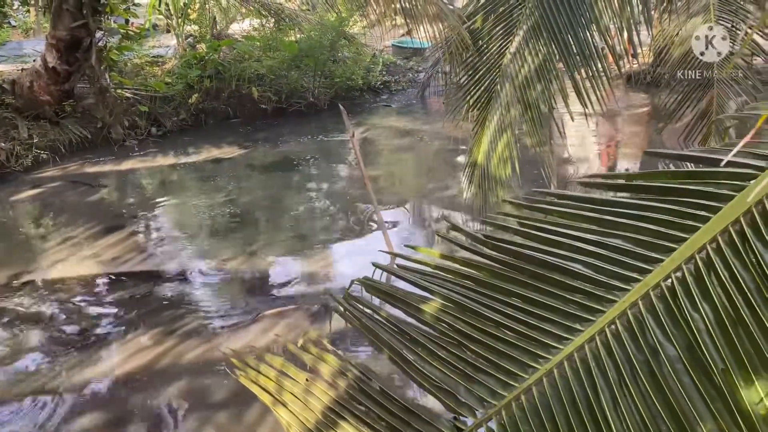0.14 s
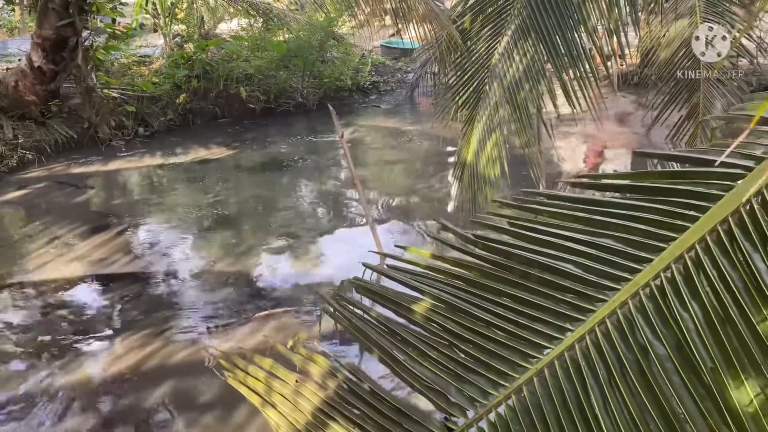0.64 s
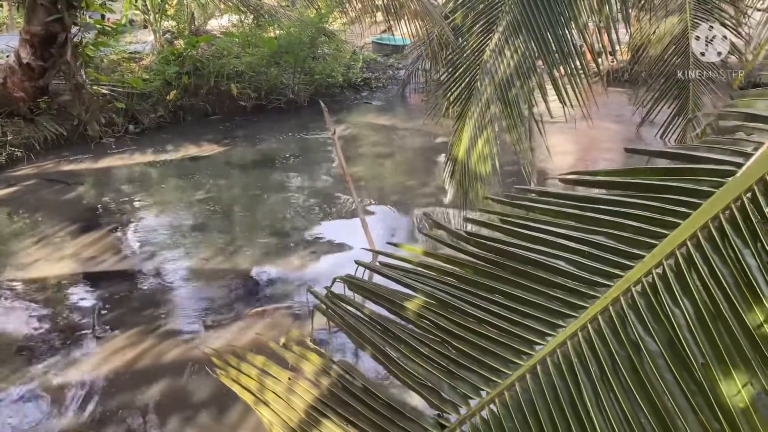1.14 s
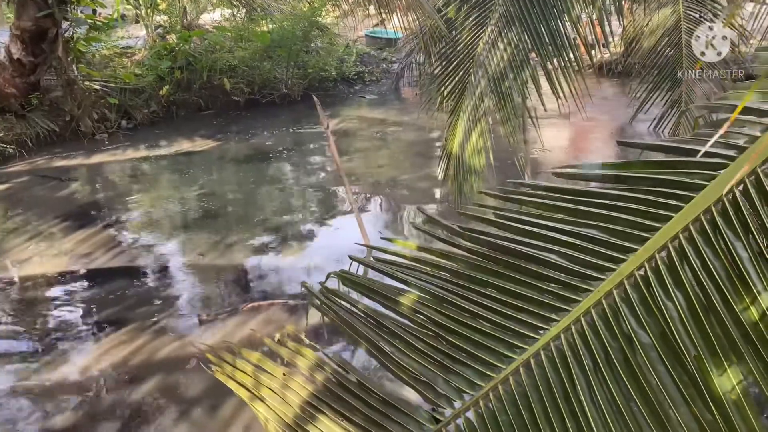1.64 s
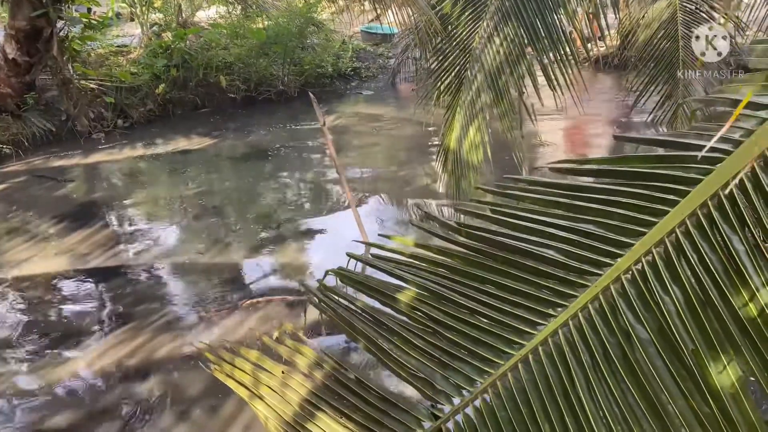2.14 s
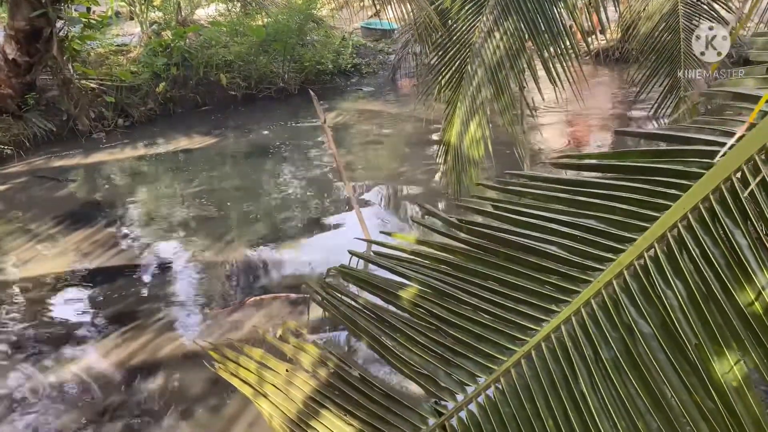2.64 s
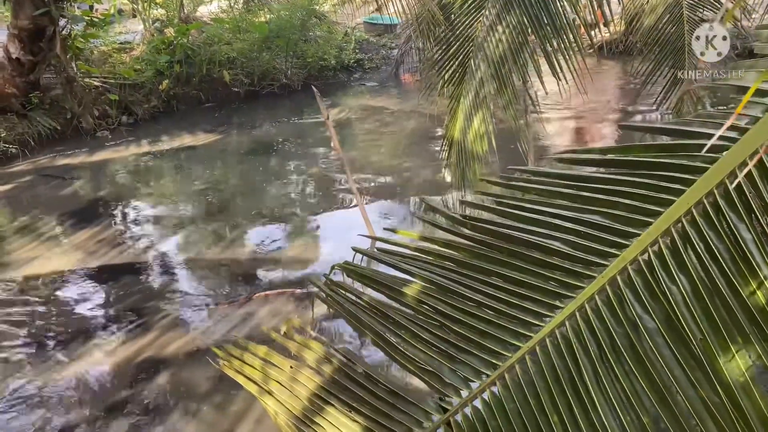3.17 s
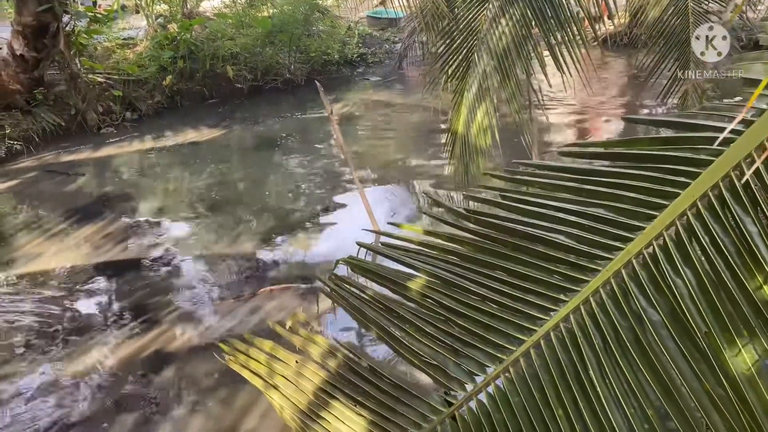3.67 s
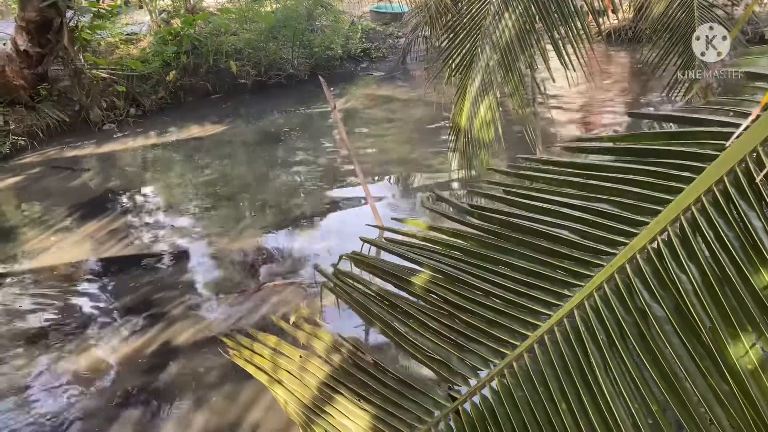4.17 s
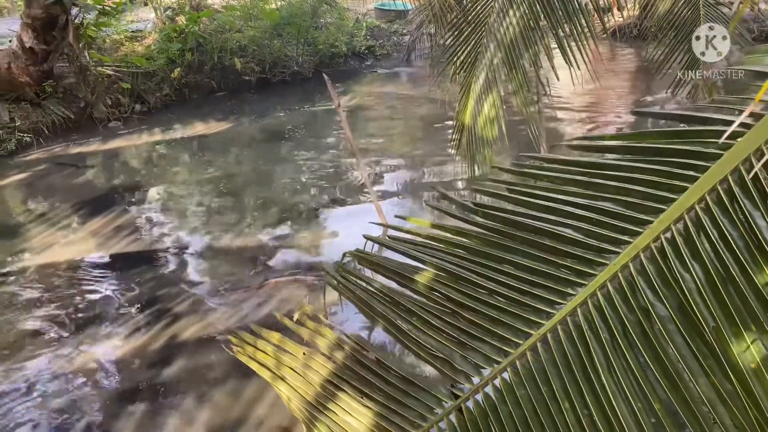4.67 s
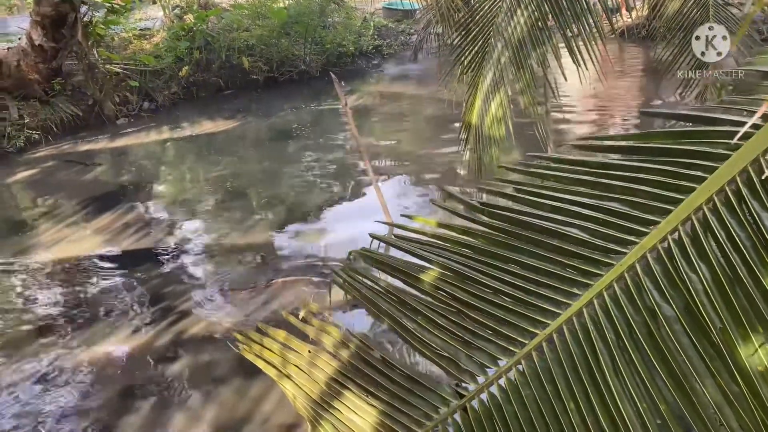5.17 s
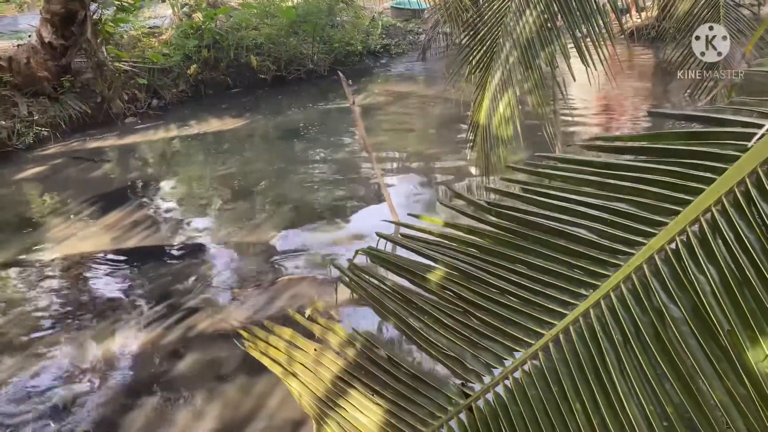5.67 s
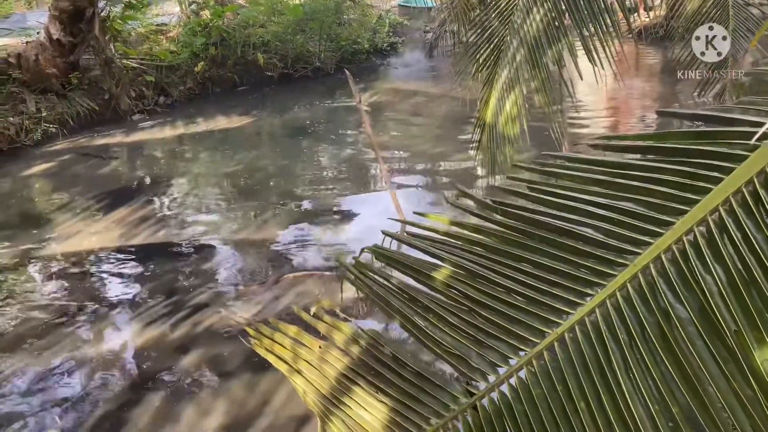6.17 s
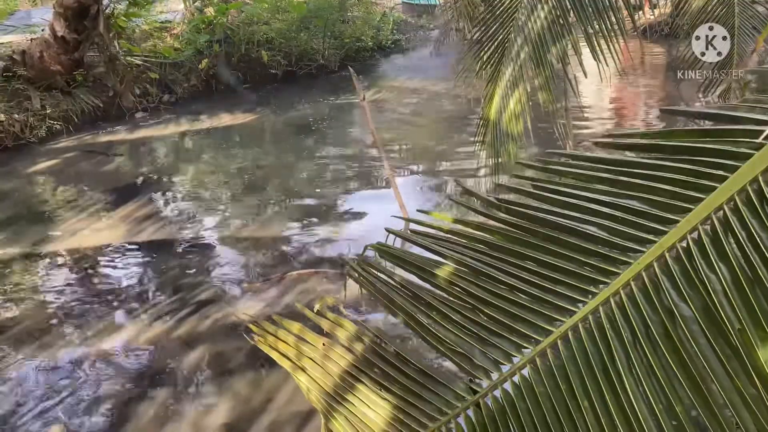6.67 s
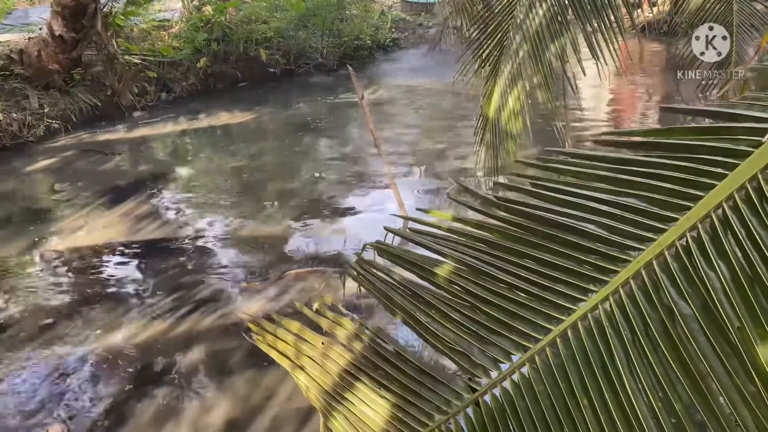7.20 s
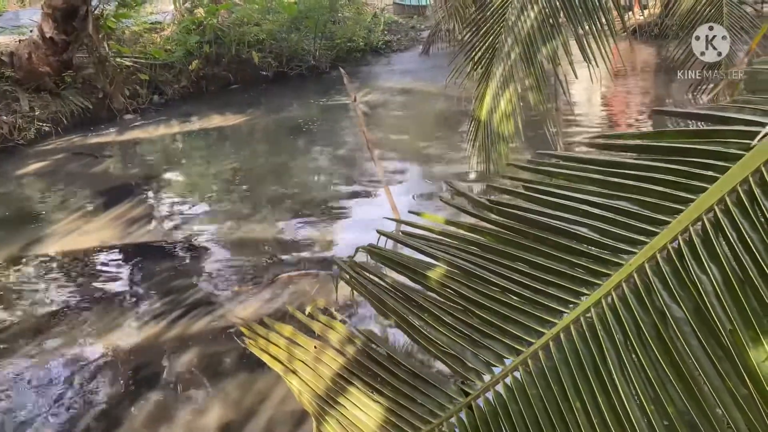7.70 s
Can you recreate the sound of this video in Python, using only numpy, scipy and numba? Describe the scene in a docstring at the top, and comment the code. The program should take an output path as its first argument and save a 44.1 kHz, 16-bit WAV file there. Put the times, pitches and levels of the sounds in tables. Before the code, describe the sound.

A phone a few metres from the water picks up crisp splashes and hollow bubbling plops, mixed with short, throbbing, upward bird whistles. From two to nearly five seconds it is mostly quiet, with tiny drips over faint open air. After a small splash comes a loud bright slap, then dense churning, spray and deep gurgles, thinning to plops at the end. Banks and leaves add only a short blur.

```python
"""A shallow canal, a few metres from a phone: fish thrash at the surface in bursts with calm between.
Tails slap the water (noise cracks with spray); trapped air plops and gurgles (decaying resonances).
A bird whistles upward in the palms and a second one buzzes (frequency-swept sines); a faint coo is far off.
Banks and leaves return a short blur (noise response) over a distant low rumble (shaped noise)."""
import sys
import numpy as np
from scipy import signal
from scipy.fft import rfft, irfft
from scipy.io import wavfile
from scipy.ndimage import uniform_filter1d
from numba import njit

SR = 44100
rng = np.random.default_rng(int(sys.argv[2]) if len(sys.argv) > 2 else 0)


def linear_from_db(decibels):
    """Turn decibels (scalar or array-like) into linear amplitude factors; 0 gives 1."""
    return 10 ** (np.asarray(decibels, float) / 20)


def store_wav(level_fs):
    """Save 16-bit WAV to argv[1]."""
    pcm = np.round(np.clip(np.atleast_2d(level_fs), -1, 1) * 32767)
    wavfile.write(sys.argv[1], SR, pcm.T.astype(np.int16))


N = 344862
TIME = np.arange(N) / SR


def level(x, db):
    """Root-mean-square normalisation: scale the signal to an rms level in dB."""
    return x * linear_from_db(db) / np.sqrt(np.mean(x ** 2))


def band(x, lo_hz, hi_hz, order=2):
    """Band-pass filtering with a maximally flat passband."""
    sos = signal.butter(order, [lo_hz, min(hi_hz, .45 * SR)], "band", fs=SR, output="sos")
    return signal.sosfilt(sos, x)


def walk(rate):
    """Slow random modulation: normal values held for 1 / rate s, then slewed twice; spread near 1."""
    hold = int(SR / rate)
    held = np.repeat(rng.standard_normal(N // hold + 1), hold)
    return 1.3 * uniform_filter1d(uniform_filter1d(held, hold), hold)[:N]


def air():
    """Ambient noise: spectrally shaped rumble and leaf hiss; octaves swell together and flicker alone."""
    # noise spectrum: (frequency [Hz], relative density [dB per Hz])
    spectrum = [(18, -51.5), (30, -23), (42, -14), (62, 0.5), (125, -4), (170, -10), (280, -7.5),
                (340, -12), (500, -13), (850, -16.5), (2750, -32), (6000, -32.5), (11400, -34),
                (16000, -40)]
    hz, db = np.transpose(spectrum)
    f = np.arange(N // 2 + 1) * SR / N + 1e-3
    colour = rfft(rng.standard_normal(N)) * linear_from_db(np.interp(np.log(f), np.log(hz), db))
    out, swell = 0, walk(0.73)
    for centre in 22 * 2. ** np.arange(10):
        # neighbouring octaves crossfade and add up to one
        share = np.cos(np.pi / 2 * np.clip(np.log2(f / centre), -1, 1)) ** 2
        out = out + irfft(colour * share, N) * linear_from_db(0.5 * swell + 1.1 * walk(8))
    return level(out, -59.5)


def blur(x, t60_s, wet_db, low_hz=503.0, top_hz=7000., gap_s=0.0053, lump_db=5.):
    """Diffuse scattering from banks and leaves: convolution with exponentially decaying noise."""
    t = TIME[:SR // 2]
    lumps = linear_from_db(lump_db * walk(251)[:len(t)])  # trunks and banks stand out as separate returns
    tail = band(rng.standard_normal(len(t)) * lumps, low_hz, top_hz, order=1)
    # the returns build up over gap_s and fall 60 dB in t60_s
    tail = tail * 1000 ** (-t / t60_s) * np.clip(t / gap_s, 0, 1) ** 2
    tail = linear_from_db(wet_db) * tail / np.sqrt(np.sum(tail ** 2))
    return x + signal.fftconvolve(x, tail)[:N]


def whistles():
    """Frequency and amplitude modulation: a sine climbs in pitch while its level throbs."""
    # contour of one whistle: (time from start [s], frequency [Hz], relative level [dB])
    contour = [(0, 3700, -12), (.012, 3740, 1), (.025, 3800, -5), (.035, 4000, -2.5), (.08, 4490, 0),
               (.12, 5050, -1.5), (.145, 5650, -7), (.17, 6350, -10), (.185, 6500, -25)]
    # the whistles: (start [s], level before flutter and blur [dB], time stretch [ratio])
    calls = [(.035, -50.5, 1.15), (.41, -63, 1.1), (.76, -52.5, 1.05), (1.15, -52.5, 1),
             (1.553, -53.5, 1.08), (1.96, -51, 1.01)]
    out, (at, hz, db) = np.zeros(N), np.transpose(contour)
    for s, call_db, stretch in calls:
        start = int(s * SR)
        t = (TIME[start:][:int(at[-1] * stretch * SR)] - s) / stretch
        throb_turns = 52 * t + 60 * t ** 2 + .1 * rng.standard_normal()  # quickens
        dip = (.5 + .5 * np.cos(2 * np.pi * throb_turns)) ** 2
        throb = 1 - 0.83 * np.exp(-t / .2) * dip
        pitch = np.interp(t, at, hz) * (1 + .015 * walk(1500)[:len(t)])
        tone = np.sin(2 * np.pi * np.cumsum(pitch) / SR)
        out[start:][:len(t)] += linear_from_db(call_db + np.interp(t, at, db)) * throb * tone
    return out


def buzzes():
    """Random frequency modulation: a fast uneven trill spreads each short note into a band."""
    # the buzzes: (start [s], level before flutter and blur [dB], length [s], centre frequency [Hz])
    trills = [(0.501, -59, .1, 5700), (1.21, -56.5, 0.09, 5760), (2.625, -65, .09, 5500),
              (5.758, -71, 0.063, 6400)]
    out = np.zeros(N)
    for s, call_db, length, hz in trills:
        start = int(s * SR)
        t = TIME[start:][:int(length * SR)] - s
        pitch = hz * (1 + 0.061 * walk(900)[:len(t)])
        swell = np.abs(np.sin(np.pi * t / length)) ** 0.39
        out[start:][:len(t)] += linear_from_db(call_db) * swell * np.sin(2 * np.pi * np.cumsum(pitch) / SR)
    return out


def birds():
    """Diffuse scattering: it blurs both songs, and a fast random flutter roughens their trails."""
    song = (whistles() + buzzes()) * linear_from_db(2.5 * walk(150))
    blurred = blur(song, 0.46, 1.4, low_hz=6000., top_hz=12000., gap_s=.008, lump_db=1.5)
    return blurred * linear_from_db(2.7 * walk(400))


@njit
def ring(n, s, gain, hz, cycles, rise, snap):
    """Damped resonance, as of a bubble: a fast start, exponential decay and a gliding pitch."""
    out = np.zeros(n)
    for k in range(len(s)):
        tau = cycles[k] / hz[k] * SR  # decay constant in samples
        start = int(s[k] * SR - tau * np.log(1 + snap) / snap)  # the envelope peaks at s
        p = np.exp(2j * np.pi * hz[k] / SR)
        # the pitch shifts by the share "rise" in three decay constants
        turn = np.exp(2j * np.pi * hz[k] * rise[k] / SR / (3 * tau))
        z, slow, fast = 1.5 + 0j, np.exp(-1 / tau), np.exp(-snap / tau)
        opening = 1.
        for i in range(start, min(start + int(5 * tau), len(out))):
            z, p, opening = z * p * slow, p * turn, opening * fast
            if i >= 0:
                out[i] += gain[k] * (1 - opening) * z.imag
    return out


def plops():
    """Damped sines: plops and drips, high rings within the slaps, a faint far coo-like note near 3.85 s."""
    # (time of envelope peak [s], nominal level [dB], starting frequency [Hz],
    #  decay constant [cycles], pitch glide [share, negative falls])
    rings = [(.0339, -32, 919, 4.4, 0.016), (.0584, -34, 1760, 5.2, 0), (0.0636, -44.5, 289, 4.6, 0.24),
             (.2285, -36, 1663, 4.6, 0), (0.2826, -30.5, 1799, 3, 0), (.3432, -34, 1888, 5.7, -0.044),
             (0.4095, -29, 1046, 2.6, 0.26), (0.4156, -26, 6330, 7.9, 0), (.432, -33, 875, 3.1, 0),
             (.4565, -34.5, 1760, 8.1, 0.11), (0.703, -20, 976, 3.7, .08), (0.7534, -25, 4010, 4.9, -0.036),
             (.7543, -31, 1767, 4.4, 0), (0.915, -37, 3079, 5, .11), (.9633, -32.5, 1665, 4.2, 0),
             (.9763, -27, 3439, 3.3, 0), (1.0107, -39, 918, 4.2, 0), (1.0656, -39.5, 740, 5.6, 0.27),
             (1.0915, -35, 1486, 3.2, -0.042), (1.1115, -37, 1998, 3.7, 0.18),
             (1.3928, -38, 1600, 2.5, -0.055), (1.4198, -52.5, 387, 14, 1.1), (1.4258, -44, 1840, 9, 0),
             (1.4806, -46.5, 794, 8, .11), (1.5016, -45, 938, 14, 0.038), (1.6752, -46, 1723, 6.2, 0),
             (1.8593, -50.5, 3631, 11.8, .06), (1.9397, -41, 2860, 9.8, 0.21),
             (2.2863, -57.5, 1050, 10, 1.11), (2.6185, -47, 5325, 4.4, 0), (2.7727, -46.5, 1500, 3.1, 0),
             (2.967, -55, 1000, 14, .9), (3.0546, -42, 3286, 3.6, .06), (3.303, -45, 1485, 6.5, 0),
             (3.4464, -45.5, 1525, 3.3, .11), (3.4961, -46, 2240, 4.7, .13), (3.535, -43.5, 2730, 7, 0.11),
             (3.5978, -45, 3293, 6, .1), (3.825, -56, 990, 14, .05), (3.885, -57, 1020, 16.6, .05),
             (3.855, -58, 964, 14.1, .05), (3.8951, -46, 5136, 7.4, .08), (4.0638, -52, 4153, 7.7, 0),
             (4.5023, -48, 6600, 5.6, 0), (4.5095, -51, 1176, 6.7, 0), (4.5222, -48, 1394, 4.3, .09),
             (4.5961, -52, 2114, 4.1, .16), (4.7831, -52, 5983, 8.2, .14), (4.9019, -32, 6888, 6.2, .21),
             (4.9423, -41, 3882, 6.7, 0.039), (4.9423, -35, 681, 2.6, 0), (4.9453, -34, 1064, 3.5, 0),
             (4.9702, -46, 2230, 9.7, 0), (4.9727, -46, 1436, 8.2, 0), (5.056, -44, 2012, 7.7, .12),
             (5.0924, -38, 1092, 4.8, 0), (5.1229, -34, 3235, 9.1, 0.46), (5.1239, -41.5, 525, 1.8, 0),
             (5.1443, -46, 1070, 4.9, -0.09), (5.1777, -38.5, 5298, 4.2, 0), (5.2436, -38, 2360, 8, -0.022),
             (5.305, -54, 2300, 9, -.05), (5.3344, -51, 2174, 5.4, 0), (5.9395, -29, 2060, 4.3, 0),
             (5.96, -36, 3123, 5.2, 0), (5.9854, -36, 2333, 3.4, .28), (5.994, -32, 5894, 4.6, .18),
             (6.0607, -22, 6940, 5.6, .19), (6.062, -23.5, 2867, 9.8, 0), (6.0632, -31, 989, 5.3, 0),
             (6.063, -31, 1511, 7.4, .36), (6.1675, -27, 834, 7.1, .36),
             (6.1683, -26.5, 6178, 14.3, -0.061), (6.2348, -39, 580, 5.4, 0.043),
             (6.2663, -32, 6789, 5.6, 0), (6.291, -35, 650, 2, 0), (6.3236, -38, 116, 1.45, .3),
             (6.36, -22, 848, 2.46, .2), (6.367, -31.5, 250, 1.7, 0.39), (6.4159, -24, 478, 2.3, 0),
             (6.5162, -24, 2112, 2.7, 0), (6.59, -34.5, 519, 7, 0.37), (6.5988, -33, 1092, 4.5, 0),
             (6.6858, -32, 1165, 6.7, -0.08), (6.7177, -36.5, 110, 1.2, 0.37),
             (6.7517, -25, 3939, 4.6, -0.051), (6.7826, -27, 1230, 2.8, -0.066), (6.8075, -36, 587, 3.3, 0),
             (7.0325, -41, 200, 1.5, 0.37), (7.0555, -37.5, 110, 1.24, 0.41),
             (7.1001, -35.5, 1138, 12, 0.019), (7.1348, -31.5, 521, 7.4, 0.38), (7.1976, -32, 1055, 2.7, 0),
             (7.3528, -34.5, 4711, 8.5, 0), (7.401, -29, 1491, 5.8, 0.21), (7.501, -37.5, 1140, 9.1, 0.1),
             (7.703, -34, 1171, 6, 0), (7.7165, -38.5, 524, 3.6, 0.029)]
    s, db, hz, cycles, rise = np.transpose(rings)
    return ring(N, s, linear_from_db(db), hz, np.maximum(cycles, .7), rise, 4.47)


def slaps():
    """Impact noise: tails and landing sheets of water crack for milliseconds, then spray thins out."""
    # (start [s], nominal peak level [dB], centre frequency [Hz])
    impacts = [(0.2803, -23.5, 4770), (0.4085, -21, 4070), (0.7516, -18, 4160), (0.8774, -34, 5660),
               (0.9328, -27.5, 3040), (0.9722, -22.5, 3570), (1.4955, -39, 4600), (2.36, -45, 6170),
               (2.7911, -42, 2960), (3.053, -41.5, 3660), (3.4138, -38.5, 3320), (3.4436, -36, 3410),
               (3.5962, -39, 3380), (4.9008, -33, 6220), (5.1218, -40, 3560), (5.88, -38, 3400),
               (5.9394, -34, 2730), (6.0272, -31, 4470), (6.0597, -5.5, 5050), (6.1669, -22.5, 6210),
               (6.4153, -21, 3580), (6.6807, -22, 5980), (6.7501, -22.5, 7660), (6.8907, -23.5, 2860),
               (7.01, -31, 6800), (7.5552, -30.5, 6350)]
    spray_t60_s = 0.11
    out, t = np.zeros(N + SR), TIME[:SR // 2]
    crack, spray = np.exp(-t / 0.0019), linear_from_db(-11.5) * 1000 ** (-t / spray_t60_s)
    shape = (1 - np.exp(-t / 0.00032)) * (crack + spray)
    for s, db, hz in impacts:
        noise = rng.standard_normal((2, len(t)))
        # rms levels lie below the peak level because noise peaks stand well above its rms
        broad = level(band(noise[0], 0.32 * hz, 12700.0, order=1), db - 11)
        body = level(band(noise[1], 0.78 * hz, 1.3 * hz), db - 17)
        out[int(s * SR):][:len(t)] += shape * (broad + body)
    return out[:N]


def thrashing(hz, share_db):
    """Incoherent power addition: gain of the swarm around hz from stirred water plus every surge."""
    # how stirred up the water is:
    # (time [s], level at 2500 Hz before the swarm's share [dB], tilt toward small bubbles [dB per octave])
    agitation = [(0.0, -58.5, -1.8), (0.2, -63.5, -0.3), (0.3, -52.5, -1.9), (0.6, -58, 1.9),
                 (0.87, -61, 3.5), (1.15, -63, 0.5), (1.45, -63, 0.2), (1.85, -75, 3.1), (2.4, -74.5, 1.7),
                 (3.2, -75, 0.3), (3.5, -64, -0.5), (3.75, -73.5, -0.8), (4.4, -78.5, 2),
                 (4.87, -76.5, -0.6), (4.95, -61, -2), (5.2, -66.5, 2.2), (5.42, -78.5, 3),
                 (5.85, -74, 0.8), (6.0, -55.5, -1.3), (6.15, -56.5, -3.5), (6.5, -46, -1.5),
                 (6.85, -49, 1.5), (7.1, -55, -0.2), (7.5, -55, 0.7), (7.68, -61.5, 0.5), (7.82, -61, 0.5)]
    # surges, short swells of bubbling and spray:
    # (time of top [s], level [dB], frequency where strongest [Hz], fade to -20 dB [s])
    surges = [(0.043, -43.5, 1170, 0.1), (0.084, -53, 620, 0.1), (0.132, -51.5, 160, 0.1),
              (0.241, -43, 2750, 0.03), (0.274, -51.5, 300, 0.17), (0.279, -42, 9010, 0.08),
              (0.407, -38, 8360, 0.07), (0.411, -48, 1560, 0.32), (0.435, -44, 800, 0.09),
              (0.488, -53, 560, 0.47), (0.526, -49, 4740, 0.07), (0.614, -48, 1050, 0.3),
              (0.696, -40, 710, 0.09), (0.752, -42, 3850, 0.06), (0.881, -55, 5360, 0.3),
              (0.923, -51, 3740, 0.27), (0.965, -42.5, 1500, 0.09), (0.977, -42, 7810, 0.1454),
              (1.065, -46, 1170, 0.1356), (1.492, -58, 1070, 0.07), (1.665, -56, 4070, 0.17),
              (1.937, -64, 1670, 0.24), (2.628, -62.5, 5260, 0.15), (3.058, -58, 2820, 0.16),
              (3.298, -58.5, 1810, 0.04), (3.443, -59, 3790, 0.17), (3.601, -58, 5050, 0.07),
              (3.803, -64, 1010, 0.43), (3.903, -60, 900, 0.1), (4.452, -61, 890, 0.25),
              (4.5, -60, 1620, 0.33), (4.537, -61, 7260, 0.14), (4.785, -64.5, 7390, 0.3),
              (4.902, -58, 4390, 0.5), (4.933, -50.5, 1220, 0.26), (5.072, -56.5, 1440, 0.18),
              (5.135, -55, 3390, 0.04), (5.229, -58.5, 2710, 0.25), (5.883, -55, 8840, 0.08),
              (5.895, -56, 1200, 0), (5.902, -50, 170, 0.17), (5.942, -42, 2300, 0.08),
              (6.028, -45, 9390, 0.05), (6.059, -47, 1370, 0.1), (6.065, -38, 2180, 0.04),
              (6.076, -33.5, 8760, 0.09), (6.117, -44, 4860, 0.6), (6.163, -38, 980, 0.07),
              (6.176, -46, 8950, 0.5), (6.228, -44.5, 590, 0.17), (6.309, -46, 160, 0.5),
              (6.358, -31.5, 795, 0.07), (6.413, -40, 360, 0.07), (6.42, -39, 2890, 0.11),
              (6.421, -37, 7690, 0.1), (6.496, -38, 1820, 0.1), (6.499, -50, 630, 0.12),
              (6.572, -36, 710, 0.09), (6.678, -38.5, 6900, 0.13), (6.683, -44.5, 160, 0.23),
              (6.756, -37, 6500, 0.2), (6.781, -38, 1400, 0.08), (6.887, -45, 510, 0.02),
              (7.025, -40, 322, 0.06), (7.079, -46.5, 1120, 0.03), (7.11, -47, 8170, 0.02),
              (7.12, -39, 610, 0.06), (7.191, -45, 1230, 0.1), (7.333, -49, 760, 0.19),
              (7.397, -43, 1020, 0.03), (7.47, -48, 650, 0.1), (7.556, -50.5, 6340, 0.15),
              (7.706, -43, 720, 0.1)]
    rise_s, fall_db_per_oct = 0.0067, 7  # swell time constant; fall-off away from the strongest frequency
    t = TIME[::32]
    s, db, tilt = np.transpose(agitation)
    power = linear_from_db(np.interp(t, s, db + share_db + tilt * np.log2(hz / 2500))) ** 2
    for top, surge_db, strongest_hz, fade in surges:
        swell_db = 20 / np.log(10) * (t - top) / rise_s
        shape_db = np.where(t < top, swell_db, -20 * (t - top) / fade)
        size_db = -fall_db_per_oct * abs(np.log2(hz / strongest_hz))
        power = power + linear_from_db(surge_db + size_db + shape_db) ** 2
    return np.interp(TIME, t, np.sqrt(power))


def churn():
    """Bubble-swarm noise: seven sizes ring at random over their own hiss and follow the thrashing."""
    # (lowest frequency [Hz], highest frequency [Hz], rate [bubbles per s], nominal decay [cycles],
    #  mean spread of bubble levels [dB], hiss relative to bubbles [dB])
    swarms = [(110, 349, 60, 2.47, 2., 0), (381.5, 797, 200, 4., 2.8, -6.5), (749, 1501, 350, 4., 2.8, -7),
              (1398, 2600, 500, 5., 3, -5.5), (2508, 4600, 750, 5., 3, -4.5),
              (4410, 8200, 1400, 3.5, 3, -1.5), (7800, 14300, 2400, 3., 3, 0.5)]
    # share of each swarm in stirred water: (level [dB])
    shares = [-22.5, -6, .5, -0.9, 0, -0.1, -1.9]
    out = 0
    for share_db, (lo, hi, rate, cycles, spread_db, noise_db) in zip(shares, swarms):
        when, pitch, rarity, damping = rng.random((int(rate * N / SR), 4)).T
        hz = lo * (hi / lo) ** pitch
        size = linear_from_db(-spread_db * np.log(np.maximum(rarity, .003)))
        size = size * (hz / lo) ** .7  # small bubbles ring briefly but sharply
        # each bubble climbs in pitch as it nears the surface
        bubbling = ring(N, when * N / SR, size, hz, cycles * (.4 + damping), .12 + 0 * when, 4.)
        hiss = band(rng.standard_normal(N), lo, hi) * linear_from_db(2.66 * walk(35))
        swarm = level(level(bubbling, 0) + level(hiss, noise_db), 0)
        out = out + swarm * thrashing(np.sqrt(lo * hi), share_db)
    return out


def scene():
    """Superposition: water close by with a short blur, birds further off, open air."""
    water = blur(churn() + slaps() + plops(), 0.21, -11.5)
    return (water + birds() + air())[None]


def roll_off(x):
    """The treble ends steeply here."""
    return signal.sosfilt(signal.butter(12, 16440, fs=SR, output="sos"), x)


def record(dry):
    """Band limitation: the phone cuts the deepest bass and the very top."""
    x = signal.sosfilt(signal.butter(2, 50., "high", fs=SR, output="sos"), dry)
    x = signal.sosfilt(signal.ellip(8, .2, 60, 15750, fs=SR, output="sos"), x)
    return roll_off(x)


dry = scene()
out = record(dry)
store_wav(out)
```